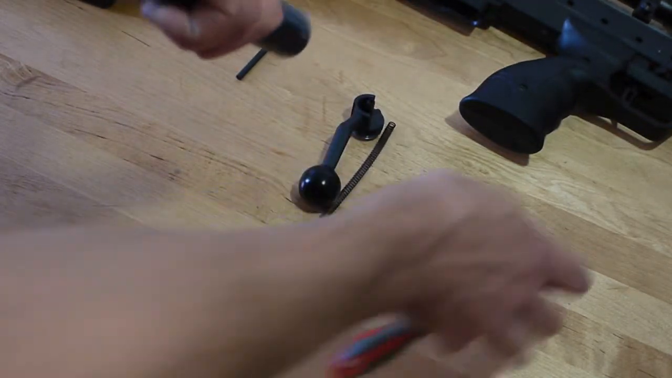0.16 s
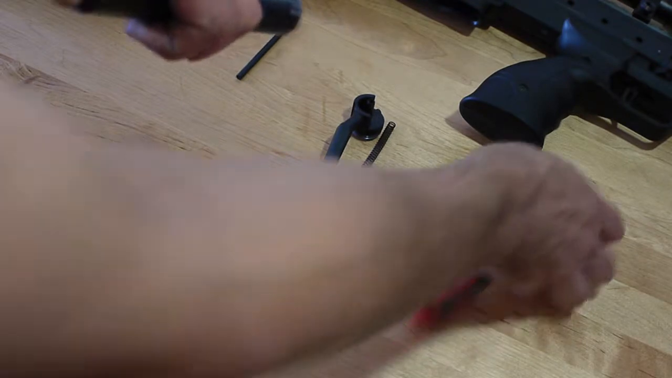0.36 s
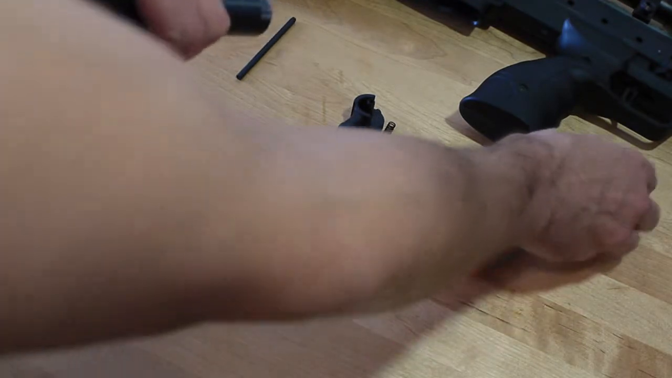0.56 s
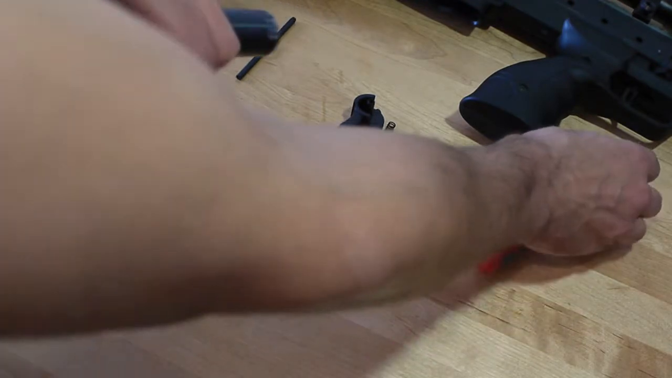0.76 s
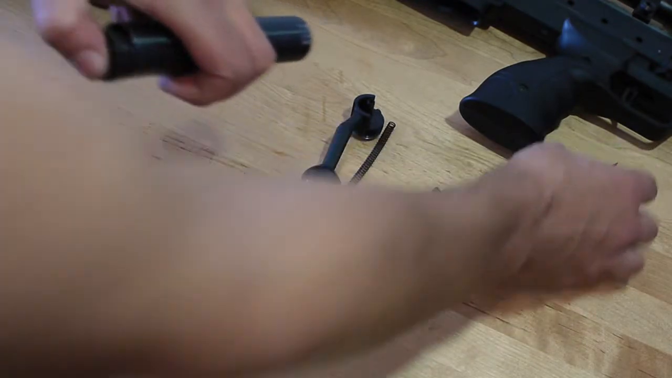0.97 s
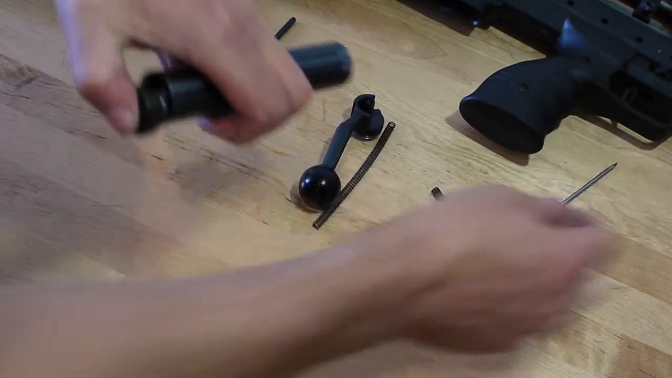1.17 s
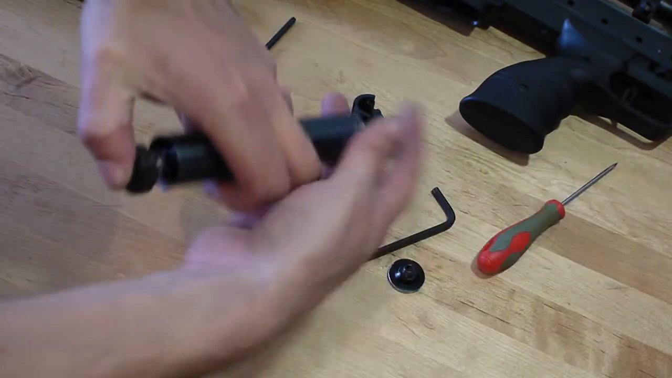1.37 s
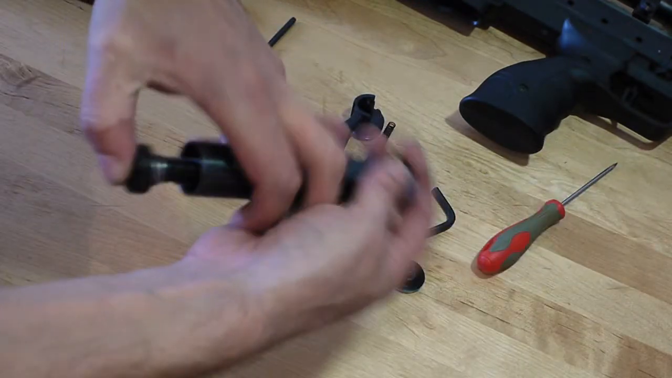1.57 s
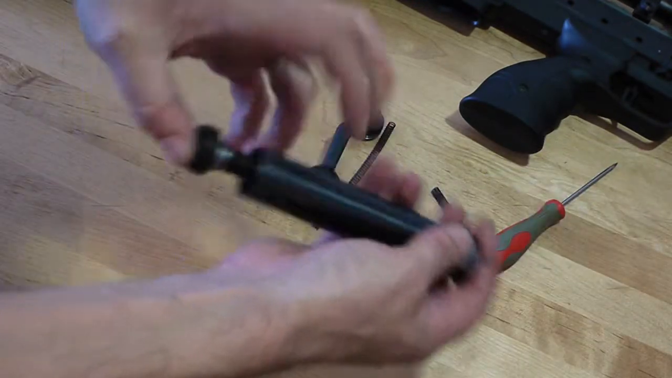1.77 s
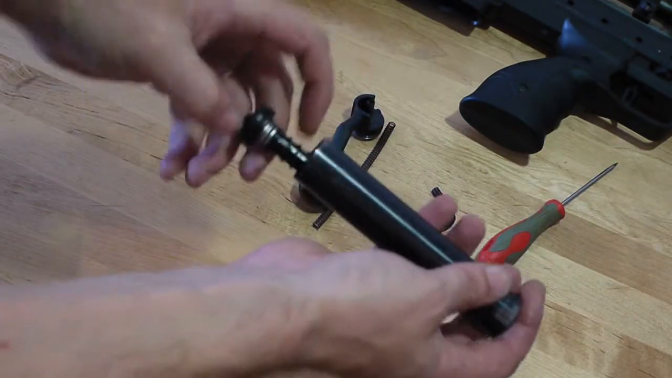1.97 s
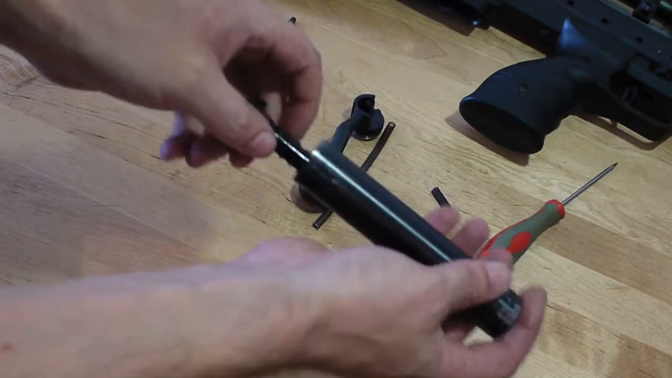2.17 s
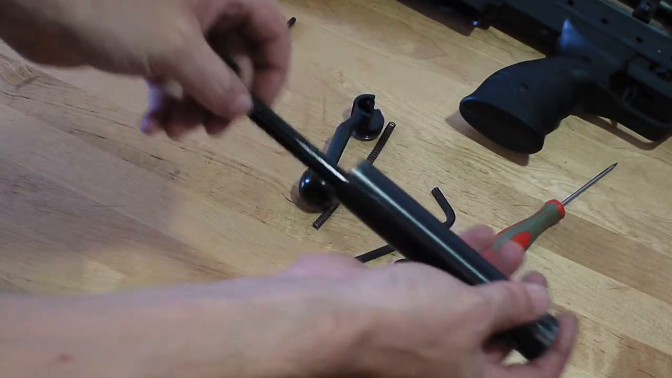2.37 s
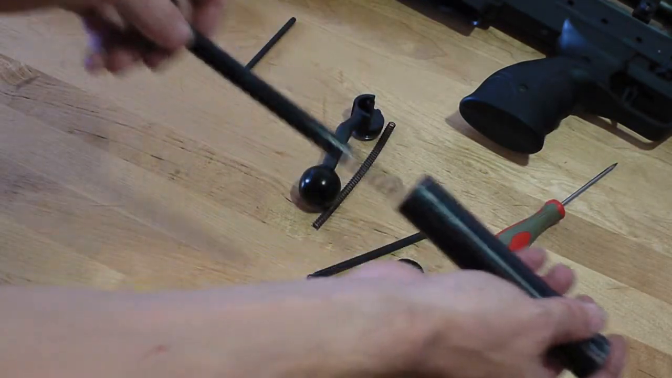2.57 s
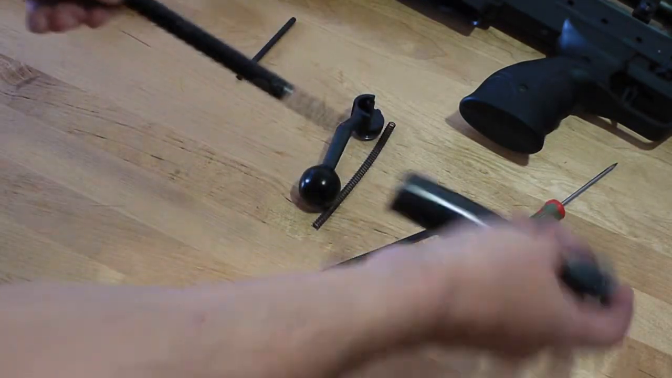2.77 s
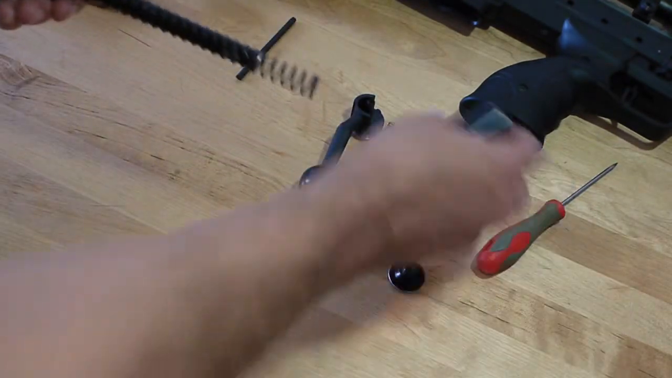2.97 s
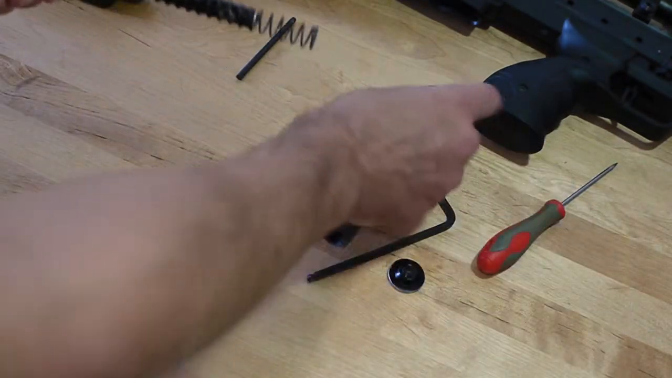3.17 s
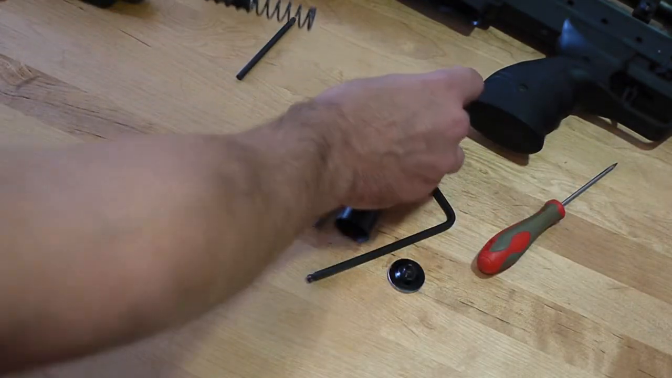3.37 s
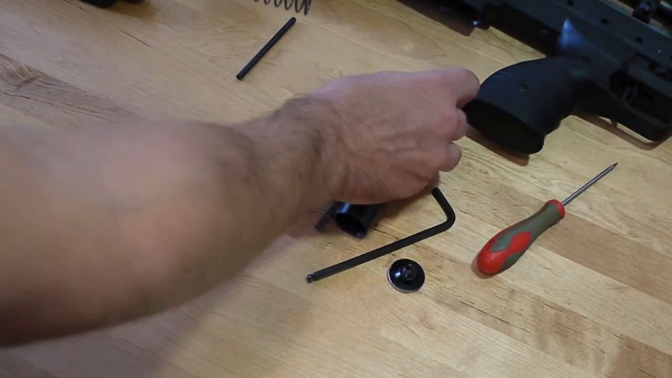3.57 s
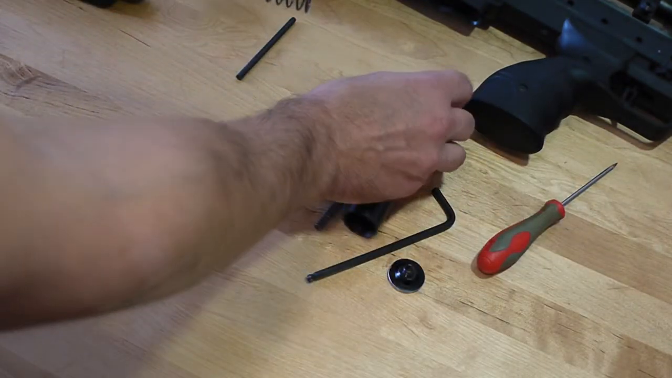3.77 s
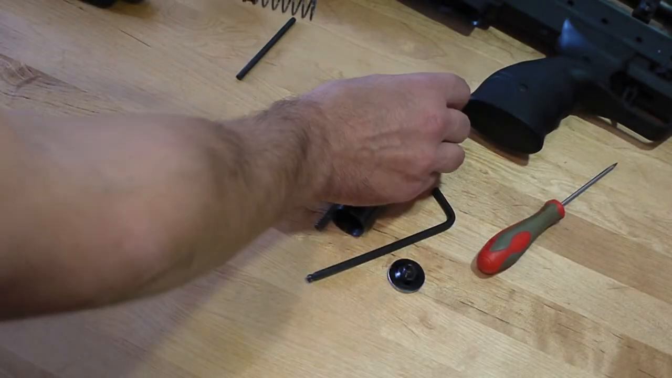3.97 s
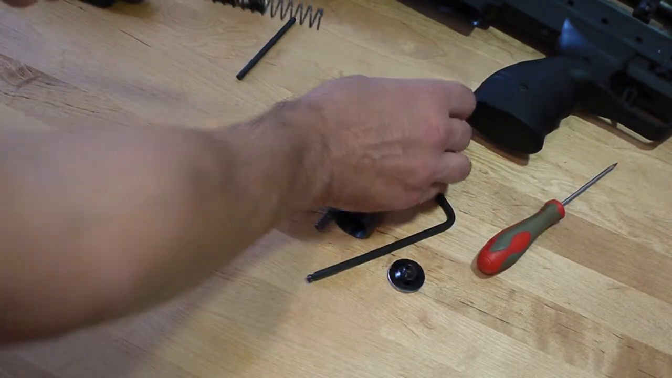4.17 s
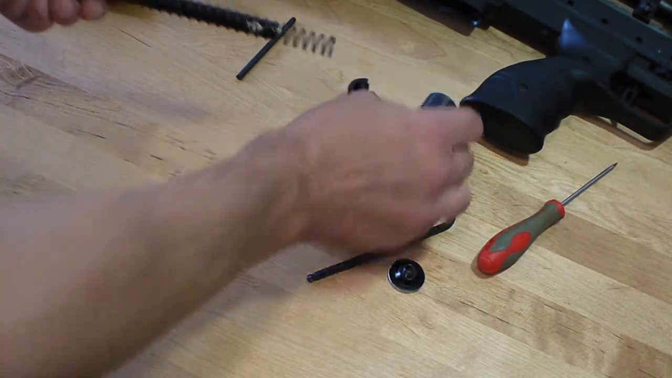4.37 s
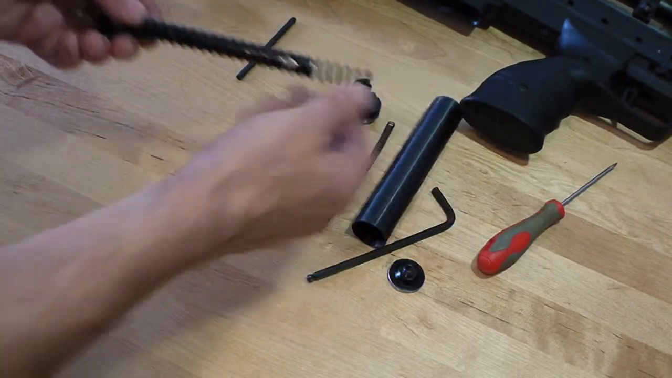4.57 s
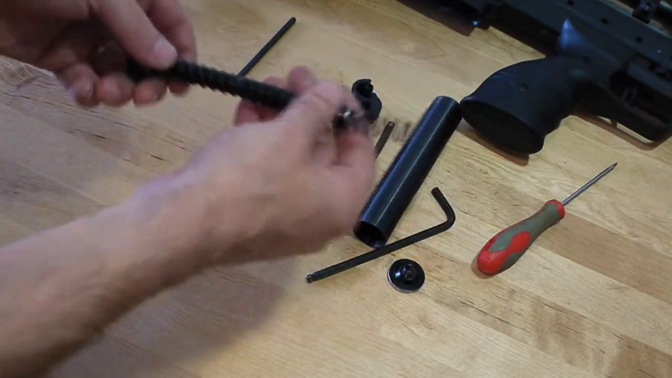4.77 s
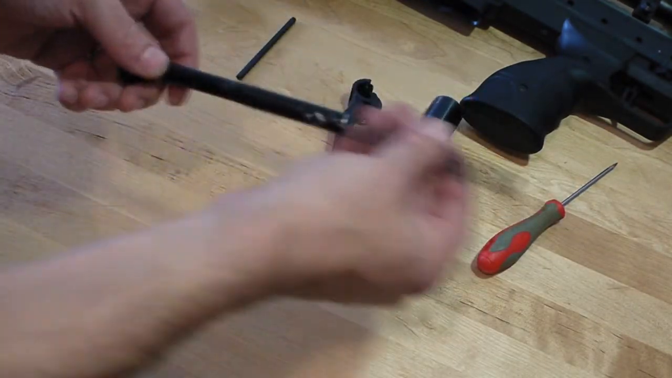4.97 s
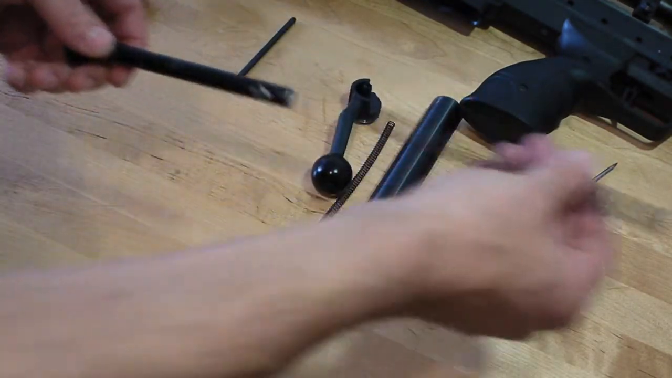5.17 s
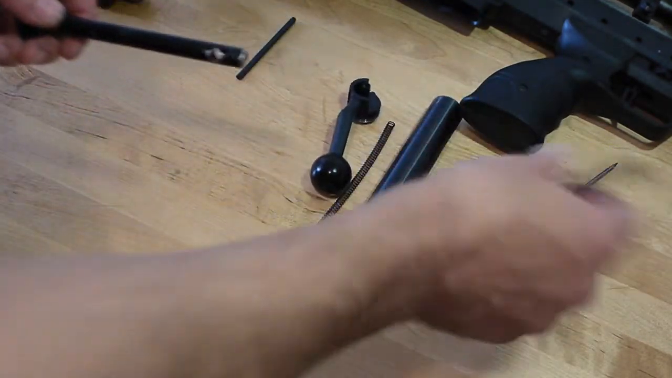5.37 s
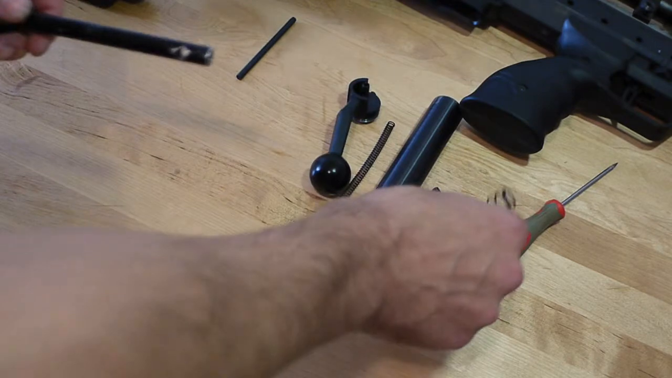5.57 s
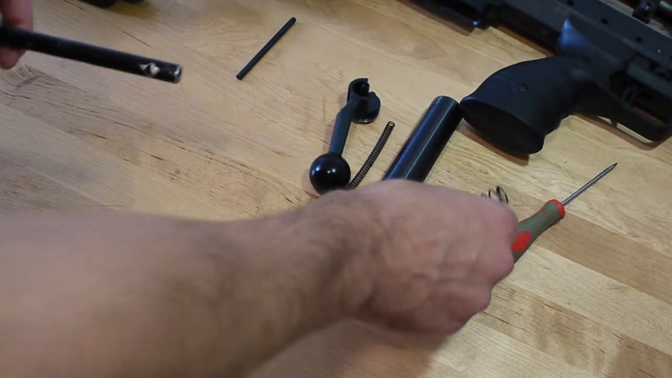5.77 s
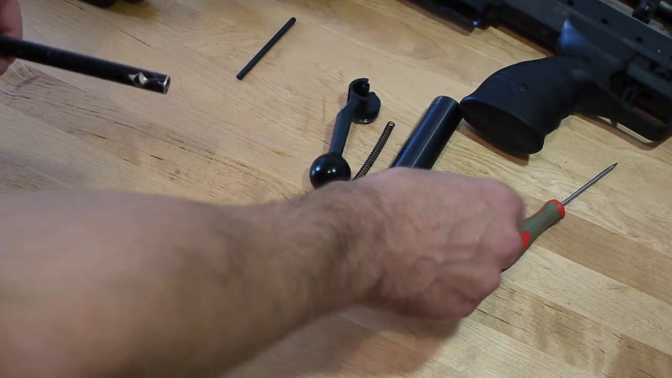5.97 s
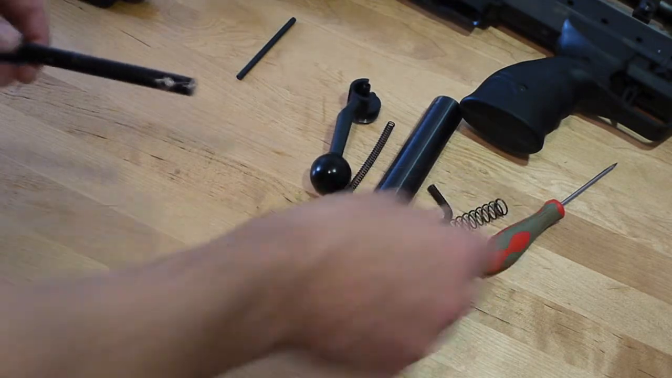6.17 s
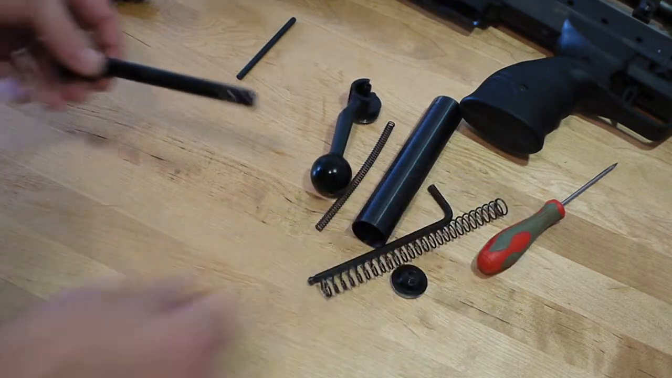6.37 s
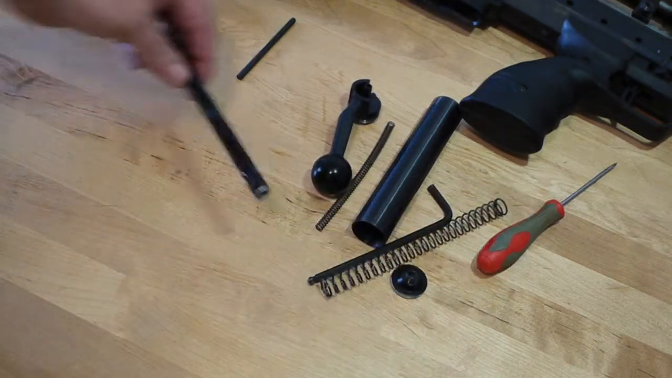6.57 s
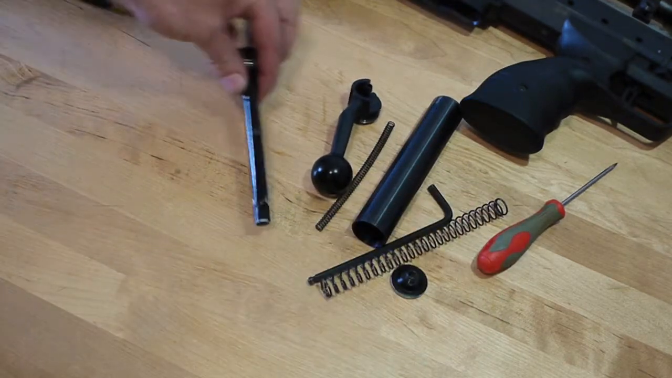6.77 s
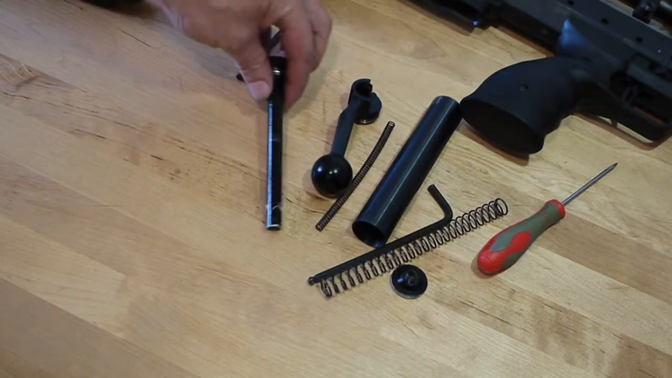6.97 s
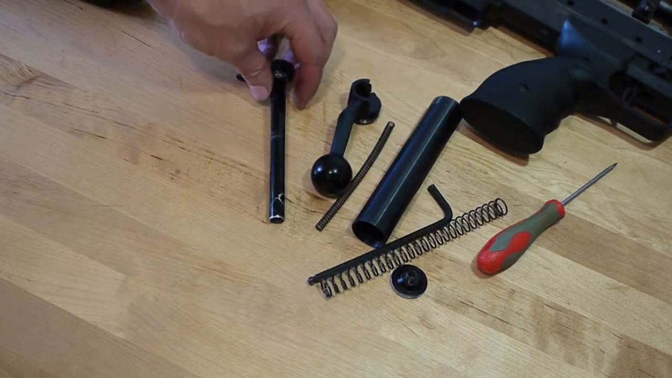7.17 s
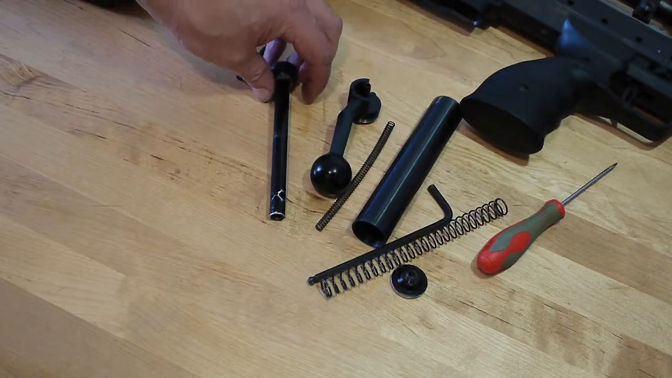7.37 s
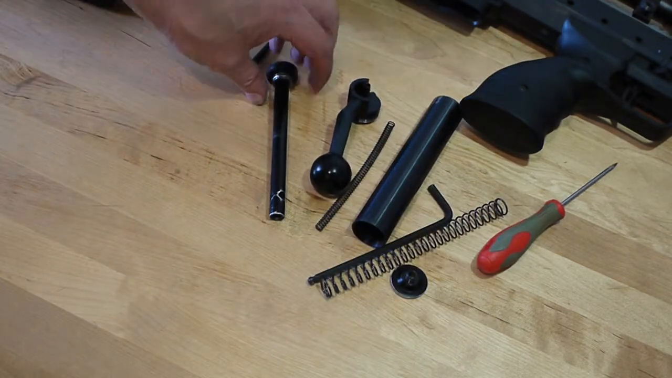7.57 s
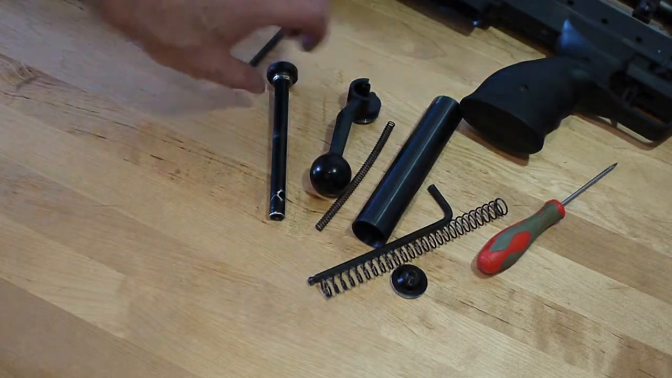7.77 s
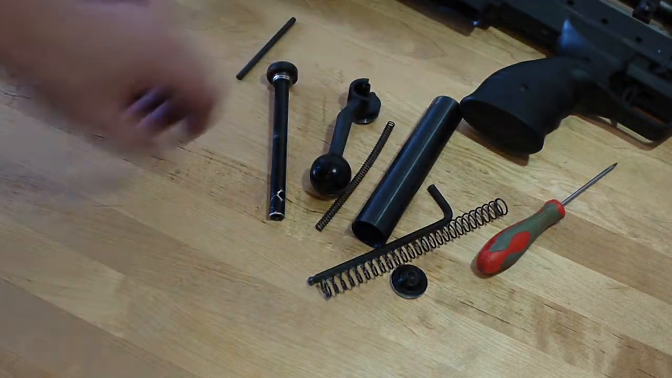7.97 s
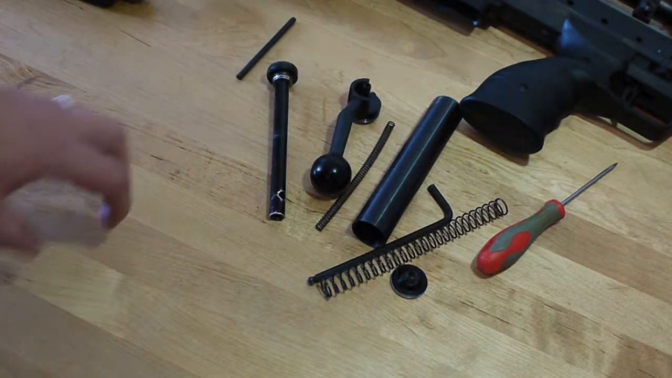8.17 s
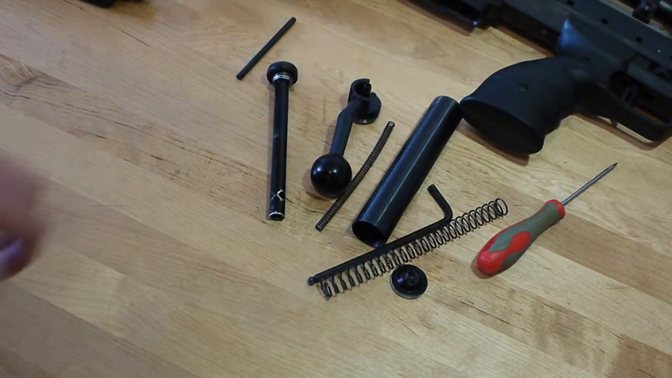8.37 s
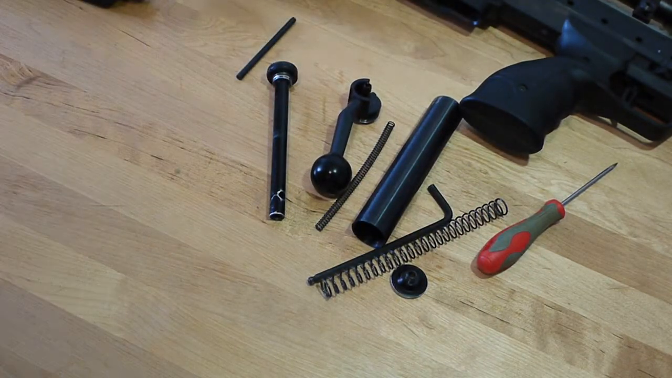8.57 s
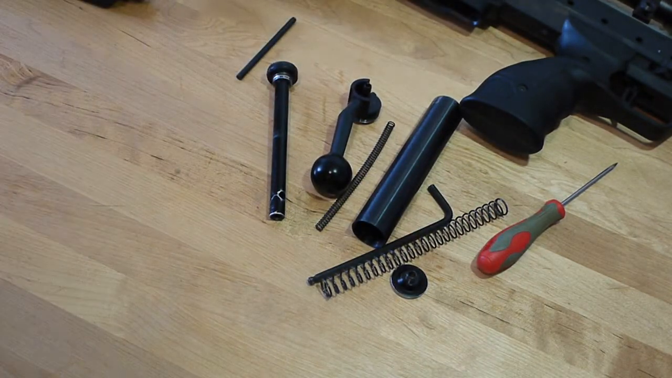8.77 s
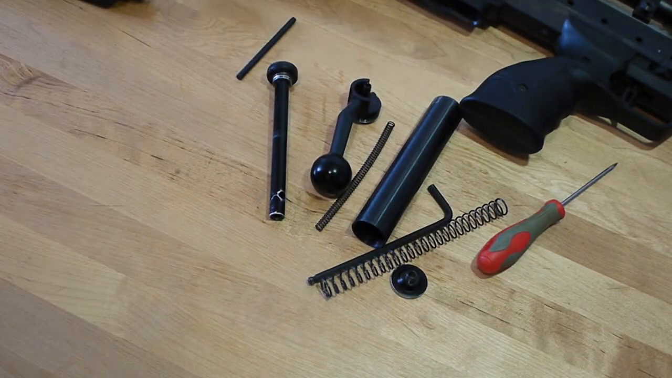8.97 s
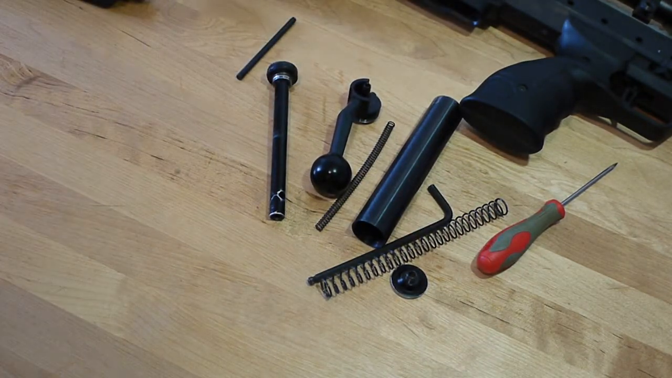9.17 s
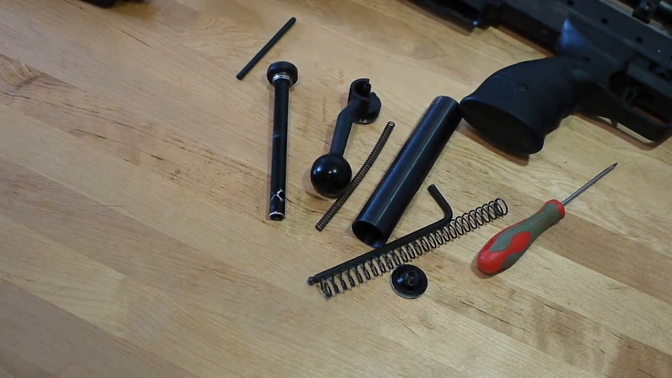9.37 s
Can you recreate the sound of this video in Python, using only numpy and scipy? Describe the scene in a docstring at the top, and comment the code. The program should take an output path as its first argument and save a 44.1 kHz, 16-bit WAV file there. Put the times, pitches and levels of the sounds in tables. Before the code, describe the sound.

Hands take apart a small mechanism: dull wooden knocks, high metallic tube rings, a brief springy rattle, soft rustles and faint hiss.

```python
"""Parts of a bolt assembly knock on a wooden table top in a small room as hands take it apart.
Each knock rings the part and the modes of the table. A rod clinks and scrapes in a metal tube, which rings;
a long spring slides off the rod and chatters on the wood. Parts are dragged in dense slips, cloth and
skin rustle as fine crackle, faint tones squeak, and a soft, patchy noise hisses under all."""
import sys
import numpy as np
from scipy import signal
from scipy.fft import rfft, irfft
from scipy.io import wavfile
from scipy.ndimage import uniform_filter1d

SR = 44100
rng = np.random.default_rng(int(sys.argv[2]) if len(sys.argv) > 2 else 0)


def linear_from_db(decibels):
    """Turn decibels (scalar or array-like) into linear amplitude factors; 0 gives 1."""
    return 10 ** (np.asarray(decibels, float) / 20)


def master_out(mix):
    """Clip the mix to full scale and print it as 16-bit PCM to the path in sys.argv[1]."""
    frames = np.transpose(np.atleast_2d(mix))
    ceiling = np.clip(frames, -1, 1)
    pcm = np.round(ceiling * 32767).astype(np.int16)
    wavfile.write(sys.argv[1], SR, pcm)


N = 415863  # length in samples

# resonances of the table top: pitch_hz [Hz], level_db [dB, relative]
TABLE_MODES = [(140.0, -55.5), (306.8, -54.5), (457.6, -49), (532.9, -54), (570.6, -58), (640.6, -51),
               (872.1, -42.5), (931.3, -55.5), (1023, -50), (1141, -51), (1324, -56.5), (1405, -43.5),
               (1507, -53.5), (1540, -52), (1610, -45), (1755, -47.5), (1803, -50), (1895, -54),
               (1960, -53.5), (2040, -44), (2073, -47), (2180, -64), (2250, -74.5), (2369, -56.5),
               (2492, -69), (2579, -50.5)]
FLEX_TOP_HZ, THUD_TOP_HZ = 400, 750  # the table flexes below the first, thuds up to the second, knocks above
# pitch [Hz], width [Hz], level [dB]; wood damps high modes more, so they are wider
THUD_MODES = [(hz, 10 + 0.073 * hz, db) for hz, db in TABLE_MODES if FLEX_TOP_HZ <= hz < THUD_TOP_HZ]
KNOCK_MODES = [(hz, 15 + 0.041 * hz, db) for hz, db in TABLE_MODES if hz >= THUD_TOP_HZ]


def evened(x):
    """Scales to rms 1."""
    return x / np.sqrt(np.mean(x ** 2) + 1e-20)


def peaked(x):
    """Scales so that the loudest 5 ms have rms 0.5, a peak near 1."""
    return .5 * x / np.sqrt(uniform_filter1d(x ** 2, 220).max() + 1e-20)


def add(mix, start_s, sound):
    """Mixes a sound in at its start time."""
    part = mix[round(start_s * SR):][:len(sound)]
    part += sound[:len(part)]


def softened(x, hz):
    """A yielding contact feeds little above hz."""
    return signal.sosfilt(signal.butter(3, hz, fs=SR, output="sos"), x)


def above(x, hz):
    """Small or stiff things radiate little below hz."""
    return signal.sosfilt(signal.butter(4, hz, "high", fs=SR, output="sos"), x)


def read(points, hz):
    """Reads a spectrum, given as points, on a log-frequency axis."""
    point_hz, value = np.transpose(points)
    return np.interp(np.log(hz + 1), np.log(point_hz + 1), value)


def colour(points):
    """Impulse response with the given spectrum, sounding only after the impulse."""
    half_db = np.maximum(read(points, np.fft.rfftfreq(4096, 1 / SR)), -100)
    half = np.log(linear_from_db(half_db))
    log_gain = np.concatenate([half, half[-2:0:-1]])
    spectrum = np.exp(np.conj(signal.hilbert(log_gain)))  # minimum phase
    return np.fft.ifft(spectrum).real[:2048]


def ring(modes, spread_db=0, count=6000):
    """Impulse response of resonances; the struck spot favours some of them at random."""
    hz, width_hz, db = np.transpose(modes)[:, :, None]
    t = np.arange(count) / SR
    sign = (-1.) ** np.arange(len(hz))[:, None]  # neighbours move in opposite phase
    spot = linear_from_db(spread_db * rng.standard_normal(hz.shape)) * sign
    decay = np.exp(-np.pi * width_hz * t)  # a wide resonance dies fast
    return (spot * linear_from_db(db) * width_hz * decay * np.sin(2 * np.pi * hz * t)).sum(0)


def crack(hz):
    """A short ring inside the wide band of a hard contact, thinning gradually upward."""
    narrow = peaked(np.diff(ring([(hz, .12 * hz, 0)], count=400)))
    wide = peaked(np.diff(ring([(hz, .7 * hz, 0)], count=400)))
    return softened(narrow + .7 * wide, 1.25 * hz)


def clatter(hz, t60_s):
    """The many small modes between the clear ones: a dying hash in a band around hz."""
    t = np.arange(5000) / SR
    hash_noise = rng.standard_normal(5000) * linear_from_db(-60 * t / t60_s)
    band = above(hash_noise, .6 * hz)
    return softened(softened(band, 1.45 * hz), 1.45 * hz)


def contact(seconds):
    """A first touch, then a short rough settling; all frequencies are fed nearly alike."""
    t = np.arange(1500) / SR
    touch = rng.standard_normal(1500) * np.exp(-t / seconds)
    touch /= np.linalg.norm(touch)
    touch[0] += .5
    spectrum = rfft(touch)
    flat = irfft(spectrum / abs(spectrum))  # every frequency equally strong
    return flat * np.exp(-t / (3 * seconds))


def struck(response, seconds):
    """A blow: the response of a body to one contact."""
    return peaked(signal.oaconvolve(contact(seconds), response))


def grains(count, per_s, spread_db):
    """Sparse clicks of random sign; spread_db above 0 makes a few of them large."""
    chance, size = rng.random(count), rng.exponential(1, count)
    click = rng.standard_normal(count) * (chance < per_s / SR)
    return click * linear_from_db(spread_db * np.minimum(size, 4))


def stroke(rise_s, fall_s, hold_s=0, bend=1.5):
    """Level in dB of one stroke: swells to 0, holds, sinks."""
    depth_db = 22  # it starts and ends this far under its peak
    t = np.arange(0, rise_s + hold_s + fall_s, 1 / SR)
    away = np.maximum(np.maximum(1 - t / rise_s, (t - rise_s - hold_s) / fall_s), 0)
    return -depth_db * away ** bend


def through(x, response):
    """Filters x to rms 1 over its own length."""
    out = signal.oaconvolve(x, response)[:len(x)]
    return out / np.sqrt(np.mean(out ** 2) + 1e-20)


def knocks():
    """Each blow rings the part and the table, mostly near the part's pitch; heavy ones flex the top."""
    # parts set on the table, with bounces:
    # start_s [s], knock_db [dB], thud_db [dB], crack_db [dB], part_hz (ring of the part) [Hz]
    part_blows = [(0.296, -12, -17, -17, 2200), (0.314, -11.5, -21.5, -46, 877),
                  (0.328, -25, -43, -32, 2300), (0.344, -25, -25, -29, 859), (0.369, -27, -31, -45, 875),
                  (0.448, -33, -31, -31, 2300), (0.47, -30.5, -50, -38, 1950), (0.849, -17, -33, -40, 1100),
                  (0.86, -16, -27, -48, 1100), (0.877, -16, -25, -52, 1300), (0.894, -22, -32, -52, 1500),
                  (0.909, -27, -40, -46, 1120), (3.347, -50, -38, -70, 800), (3.362, -45, -44, -50, 2700),
                  (3.934, -20, -21, -42, 1250), (3.944, -21.5, -24, -45, 1520),
                  (3.966, -18, -23, -30, 1290), (3.977, -10, -18, -21, 1100), (3.993, -9, -44, -31, 1496),
                  (4.01, -16, -29, -35, 1600), (4.581, -31, -29, -56.5, 826), (4.6, -39, -53, -61, 813),
                  (5.849, -51, -47, -63, 1440), (6.049, -22, -52, -29, 2750), (6.054, -26, -51, -24, 3220),
                  (6.084, -23, -34, -23, 2830), (6.119, -19, -31, -32, 1600), (6.104, -24, -40, -34, 1900),
                  (6.935, -28, -44, -50, 1440), (6.956, -28, -40, -50, 1360), (6.971, -25, -35, -54, 1440),
                  (6.991, -32, -40, -55.5, 1430), (7.38, -33.5, -33, -52, 1300),
                  (7.386, -29, -49, -53, 1300), (7.401, -29, -48, -56.5, 903), (7.727, -49, -47, -46, 1900),
                  (8.612, -48.5, -71, -58, 1780), (9.302, -46, -71, -57, 1800)]
    # bright hard ticks, some of them the bright edge of a knock: start_s [s], level_db [dB], centre_hz [Hz]
    bright_ticks = [(0.449, -25, 5840), (0.47, -30, 5700), (3.672, -51.5, 4010), (3.935, -36, 4100),
                    (5.85, -49, 4600), (6.936, -33, 3800), (6.956, -34, 3700), (7.381, -41, 3800),
                    (8.788, -53, 5000), (9.04, -55, 5140), (9.187, -53, 4250)]
    # heavy blows flex the whole top: start_s [s], second_mode_db [dB], lowest_mode_db [dB]
    top_flexes = [(0.297, -37, -48.5), (0.449, -49.5, -68), (0.86, -43, -36), (3.359, -50, -59),
                  (3.407, -43.5, -61), (3.934, -39, -40.5), (3.975, -31, -39), (4.58, -36, -46.5),
                  (6.05, -43, -47), (6.118, -48, -55), (6.934, -47, -58), (7.38, -44, -54)]
    out = np.zeros(N)
    for start_s, knock_db, thud_db, crack_db, part_hz in part_blows:
        # modes an octave away from the part's pitch are 18 dB weaker
        near = [(hz, width, db - 18.0 * np.log2(hz / part_hz) ** 2) for hz, width, db in KNOCK_MODES]
        body = peaked(ring(near, spread_db=3.5))
        body += 0.55 * peaked(ring([(part_hz, 60, 0)]))
        body[:5000] += .6 * peaked(clatter(part_hz, t60_s=.07))
        thud = above(ring(THUD_MODES, spread_db=1), 360)
        add(out, start_s, linear_from_db(knock_db) * struck(softened(body, 3000), .005))
        add(out, start_s, linear_from_db(thud_db) * struck(softened(thud, 790), .005))
        add(out, start_s, linear_from_db(crack_db) * struck(crack(3100), .0025))
    for start_s, db, hz in bright_ticks:
        add(out, start_s, linear_from_db(db) * struck(softened(crack(hz), 1.2 * hz), .003))
    lowest_hz = [hz for hz, db in TABLE_MODES if hz < FLEX_TOP_HZ]
    for start_s, *levels_db in top_flexes:
        for hz, db, width_hz in zip(lowest_hz[::-1], levels_db, (16, 9)):
            flex = ring([(hz, width_hz, 0)], count=12000)
            add(out, start_s, linear_from_db(db) * peaked(softened(flex, 1.2 * hz)))
    return out


def tube_rings(length):
    """Long and short ring of the tube; the grip shortens the first, the second shifts a little at random."""
    # long ring: pitch_hz [Hz], level_db [dB], t60_s (time to sink 60 dB, before the grip's factor) [s]
    long_modes = [(5090, -18, 0.07), (5216, -7.5, 0.2), (5255, -3, 0.43)]
    # short rings: pitch_hz (before the shift) [Hz], width_hz [Hz], level_db [dB]
    short_modes = [(5150, 250, 0.5), (5520, 340, -8), (5770, 170, 16.5), (5800, 83, 5), (6020, 650, -37)]
    swell = 1 - np.exp(-np.arange(20000) / SR / 0.0033)  # the long ring grows out of the blow
    damped = [(hz, 2.2 / (t60_s * length), db) for hz, db, t60_s in long_modes]  # 2.2 / t60 is the width
    shift = 1 + .015 * rng.standard_normal()
    upper = ring([(hz * shift, width, db) for hz, width, db in short_modes], spread_db=2)
    return swell * ring(damped, spread_db=2, count=20000), above(upper, 4600)


def clinks():
    """Blows of the rod and of the falling spring, and scrapes of the rod, ring the tube, which has a close pair
    of modes that beat."""
    # blows on the tube, by the rod and, at 6.23 s, by the falling spring: start_s [s], ring_db [dB],
    # upper_ring_db [dB], crack_db [dB], crack_hz (centre) [Hz]
    tube_blows = [(1.568, -46, -33, -48, 4000), (1.617, -45, -38, -59, 3280), (1.694, -42, -35.5, -32, 3100),
                  (1.9335, -34.5, -29.5, -40, 4800), (1.9794, -57, -61, -56, 4750),
                  (2.1807, -33.5, -25, -28, 3900), (2.2957, -48.5, -50.5, -64, 4620),
                  (2.4513, -50, -56, -57, 4790), (2.5185, -42, -43, -43, 4680),
                  (2.5404, -33, -46, -44, 3360), (2.5745, -30, -32, -35, 4800),
                  (3.9362, -49, -49, -50, 3060), (3.9684, -45, -52, -45, 3320),
                  (4.0864, -49, -56, -50, 2690), (4.149, -55, -70, -56, 2690), (6.23, -47, -55, -45, 4700)]
    # the rod scrapes along the bore: start_s [s], rise_s [s], fall_s [s], ring_db [dB], upper_ring_db [dB]
    rod_scrapes = [(1.575, .055, .05, -46, -50), (2.41, .04, .04, -52, -55), (2.51, .035, .04, -42, -53),
                   (2.565, .03, .14, -39, -53)]
    firm_grip, loose_grip, grip_eases_s = .28, .45, 1.8  # factors on the ring length; time in s
    out = np.zeros(N)
    for start_s, ring_db, upper_db, crack_db, crack_hz in tube_blows:
        length = firm_grip if start_s < grip_eases_s else loose_grip
        # the hand-held parts knock dully, 12 dB under each crack
        levels_db = ring_db, upper_db, crack_db, crack_db - 12
        responses = *tube_rings(length), crack(crack_hz), clatter(1700, t60_s=.025)
        for db, response in zip(levels_db, responses):
            add(out, start_s, linear_from_db(db) * struck(response, 0.0036))
    for start_s, rise_s, fall_s, *levels_db in rod_scrapes:
        shape_db = stroke(rise_s, fall_s, bend=1.2)
        slips = evened(grains(len(shape_db), per_s=1600, spread_db=-1.0))
        for db, response in zip(levels_db, tube_rings(0.3)):
            response = response / np.linalg.norm(response)
            add(out, start_s, signal.oaconvolve(linear_from_db(db + shape_db) * slips, response))
    return out


def spring():
    """Coils tick over the rod, later the whole spring chatters on the wood: both are coloured clicks."""
    # coils slide off the rod: start_s [s], rise_s [s], hold_s [s], fall_s [s], level_db [dB]
    coil_slide = (4.86, .05, .23, .07, -63)
    # ring of the coils: pitch_hz [Hz], width_hz [Hz], level_db [dB, relative]
    coil_modes = [(2690, 180, 9.5), (4450, 600, 0), (5770, 1300, -1), (6400, 800, -16)]
    # spring on the table: start_s, rise_s, burst_s (fall of the first burst), dying_s (fall of the rest) [s],
    # burst_db, chatter_db [dB]
    spring_drop = (6.048, .006, .03, .26, -28, -29.5)
    # spectrum of the chatter: pitch_hz [Hz], level_db [dB, relative]
    chatter_spectrum = [(71, -50), (120, -19), (373, -17), (443, -6), (704, -8), (822, -2), (1160, -6),
                        (2190, 0), (2560, -4.5), (2790, -2.5), (5440, -7), (6690, -12), (7290, -27.5),
                        (9480, -76), (16000, -120)]
    out = np.zeros(N)
    start_s, rise_s, hold_s, fall_s, db = coil_slide
    shape_db = stroke(rise_s, fall_s, hold_s)
    ticks = grains(len(shape_db), per_s=640, spread_db=2)
    add(out, start_s, linear_from_db(db + shape_db) * through(ticks, ring(coil_modes)))
    start_s, rise_s, burst_s, dying_s, burst_db, db = spring_drop
    level = linear_from_db(db + stroke(rise_s, dying_s, bend=2.2))
    add(level, 0, linear_from_db(burst_db + stroke(rise_s, burst_s, bend=1.1)))
    hits = grains(len(level), per_s=3500, spread_db=3.2)
    add(out, start_s, level * through(hits, colour(chatter_spectrum)))
    return out


def drags():
    """Dense slips excite the table under the stroke."""
    # parts dragged over the wood: start_s [s], rise_s [s], fall_s [s], thud_db [dB], knock_db [dB]
    part_drags = [(.375, .005, .17, -42, -40), (.635, .03, .07, -51, -70), (3.335, .045, .14, -35.5, -43),
                  (3.72, .066, .08, -55, -75), (4.62, .005, .08, -54, -55), (4.76, .04, .05, -59, -80)]
    out = np.zeros(N)
    for start_s, rise_s, fall_s, thud_db, knock_db in part_drags:
        shape_db = stroke(rise_s, fall_s, bend=1.3)
        slips = grains(len(shape_db), per_s=2500, spread_db=3.5)
        thud = softened(above(ring(THUD_MODES), 240), 1400)
        damped = [(hz, 1.6 * width, db) for hz, width, db in KNOCK_MODES]
        knock = softened(ring(damped), 2100)
        crack_db = knock_db - 16
        for db, response in (thud_db, thud), (knock_db, knock), (crack_db, crack(3500)):
            add(out, start_s, linear_from_db(db + shape_db) * through(slips, response))
    return out


def rustles():
    """Cloth and skin rub: fine crackle in a wide resonance, higher for faster rubbing."""
    # rubs: start_s [s], rise_s [s], fall_s [s], level_db [dB], rubbing speed [0-1]
    rubs = [(0.0, .005, .1, -51, .15), (.425, .025, .09, -43, .92), (.94, .05, .28, -62, .55),
            (5.843, .005, .1, -60, .5), (7.11, .07, .17, -64, .8), (8.36, .3, .75, -62, .7),
            (8.545, .012, .07, -54, .5), (8.6, .015, .1, -55, .4), (8.64, .05, .12, -54, .2),
            (8.78, .012, .1, -56, .72), (9.03, .014, .1, -59, .5), (9.22, .04, .07, -61, .55),
            (9.27, .03, .05, -59, .15)]
    out = np.zeros(N)
    r = np.exp(-np.pi * 3000 / SR)  # the resonance is made of two poles, each 3000 Hz wide
    for start_s, rise_s, fall_s, peak_db, speed in rubs:
        db = peak_db + stroke(rise_s, fall_s)
        crackle = grains(len(db), per_s=5000, spread_db=1.5)
        centre_hz = 1500 + 5000 * speed
        # shift the centre down to 0 Hz, smooth there, shift back up
        turn = np.exp(2j * np.pi * np.arange(len(db)) * centre_hz / SR)
        smooth = signal.lfilter([1], np.convolve([1, -r], [1, -r]), crackle / turn)
        rub = evened((turn * smooth).real)
        add(out, start_s, signal.windows.tukey(len(db), .15) * linear_from_db(db) * rub)
    return out


def squeak():
    """Faint, unsteady whistles with their octave."""
    # whistles: start_s [s], rise_s [s], fall_s [s], pitch_hz (mean) [Hz], level_db [dB]
    whistles = [(2.96, .016, .14, 3005, -67), (3.12, .02, .06, 3330, -70), (3.2, .045, .035, 3110, -72)]
    out = np.zeros(N)
    for start_s, rise_s, fall_s, hz, db in whistles:
        shape_db = stroke(rise_s, fall_s, bend=1.0)
        waver = evened(uniform_filter1d(rng.standard_normal((2, len(shape_db))), 500))
        turns = np.cumsum(hz * (1 + 0.011 * waver[0])) / SR
        tone = np.sin(2 * np.pi * turns) + .7 * np.sin(2 * 2 * np.pi * turns)
        add(out, start_s, linear_from_db(db + shape_db + 3.0 * waver[1]) * tone)
    return out


def room(x):
    """Three tails of sparse echoes, fed in turn, each band dying at its own speed."""
    # echo of the room: pitch_hz [Hz], t60_s (time to sink 60 dB) [s], level_db [dB, relative]
    room_bands = [(120, 0.56, -1), (506, 0.34, -2), (1500, 0.39, -2), (3000, 0.43, -4), (7000, .35, -4.5)]
    taps = np.zeros((3, SR // 2))
    slots = np.arange(180, SR // 2 - 20, 20)  # one echo in every 20 samples
    at = slots + rng.integers(0, 20, (3, len(slots)))
    np.put_along_axis(taps, at, rng.choice([-1., 1.], at.shape), 1)
    hz, t, z = signal.stft(taps, SR, nperseg=256)
    t60_s = read([(f, s) for f, s, db in room_bands], hz)[:, None]
    level_db = read([(f, db) for f, s, db in room_bands], hz)[:, None]
    decayed = z * linear_from_db(level_db - 60 * t / t60_s) / np.sqrt(t60_s)  # long tails start lower
    tails = signal.istft(decayed, SR, nperseg=256)[1]
    tails = tails / np.sqrt(SR / 20 / np.log(1e6))  # evens out the number of echoes
    cycles = np.arange(N) * 1.7 / SR + np.arange(3)[:, None] / 3  # 1.7 rounds a second
    turns = np.sqrt(2 / 3) * np.cos(2 * np.pi * cycles)
    return signal.oaconvolve(x * turns, tails, axes=1).sum(0)[:N]


def hiss():
    """Room air and microphone noise, faintly patchy in time and pitch."""
    # spectrum of the hiss: pitch_hz [Hz], level_db [dB per Hz, relative]
    hiss_spectrum = [(12, -42.5), (20, -18), (43, -14.5), (175, -5), (274, -4), (342, -5), (437, -2),
                     (471, -7), (574, -5.5), (791, -7), (852, -7.5), (1500, -10.5), (4030, -18),
                     (6440, -23), (7290, -39), (9480, -62), (16000, -120)]
    frames, hz = N // 256 + 5, np.fft.rfftfreq(1024, 1 / SR)
    a, b, patches = rng.standard_normal((frames, 513, 3)).T
    patches_db = evened(uniform_filter1d(uniform_filter1d(patches, 12, 0), 20, 1))
    z = (a + 1j * b) * linear_from_db(read(hiss_spectrum, hz)[:, None] + patches_db)
    noise = signal.istft(z, nperseg=1024, noverlap=768)[1][:N]
    return linear_from_db(-60) * evened(noise)


def scene():
    """The work on the table, its room tail and the hiss."""
    work = above(knocks() + clinks() + drags() + spring() + rustles() + squeak(), 105)
    return (linear_from_db(-1.5) * work + room(work) + hiss())[None]


def band_limit(x):
    """A steep low-pass at the top of the band."""
    return signal.sosfilt(signal.butter(12, 7440, fs=SR, output="sos"), x)


def record(dry):
    """Gain control dips after loud knocks; the low sampling rate cuts the treble."""
    power_db = 10 * np.log10(abs(uniform_filter1d(dry[0] ** 2, 400)) + 1e-12)
    fall_db = np.arange(N) * 26.4 / SR  # the held level sinks 26.4 dB a second
    held_db = np.maximum.accumulate(power_db + fall_db) - fall_db
    over_db = np.maximum(held_db + 41.5, 0)  # how far it lies over -41.5 dB
    ducked = dry / linear_from_db(0.097 * uniform_filter1d(over_db, 300))
    low_pass = signal.firwin(255, 7137, window=("kaiser", 7), fs=SR)  # edge in Hz
    cut = signal.oaconvolve(ducked, low_pass[None], "same")
    return band_limit(cut)


dry = scene()
out = record(dry)
master_out(out)
```